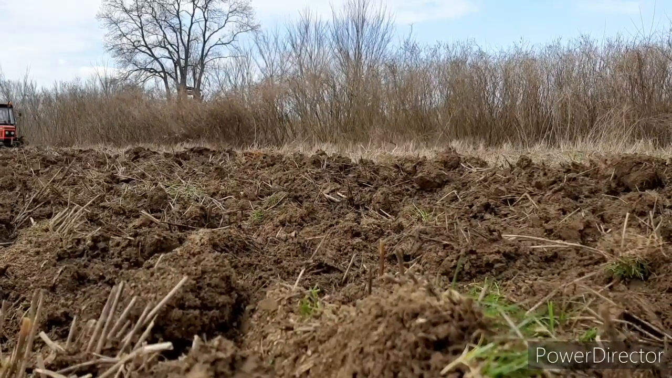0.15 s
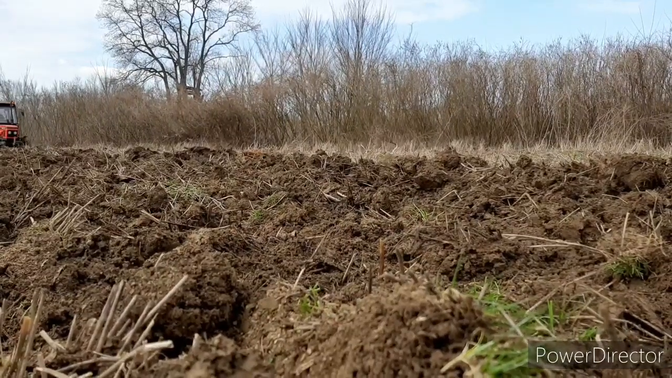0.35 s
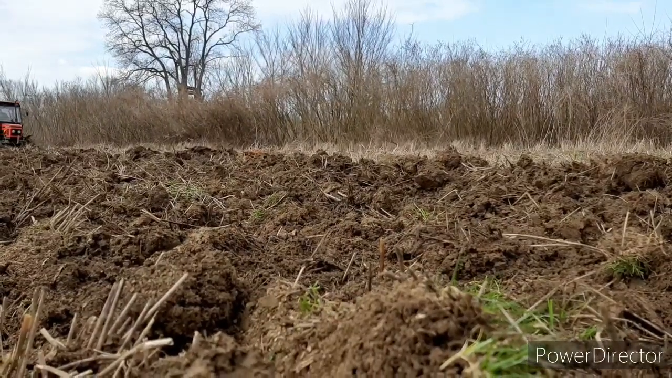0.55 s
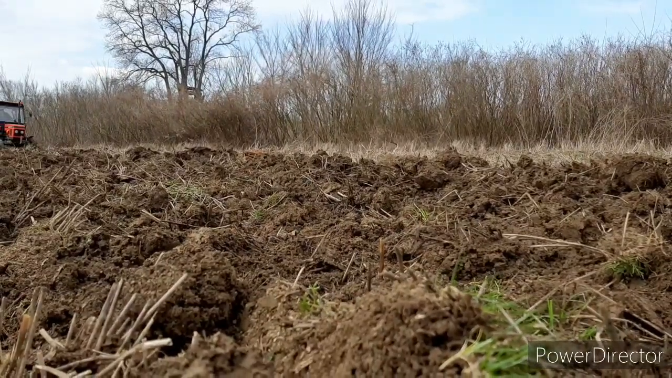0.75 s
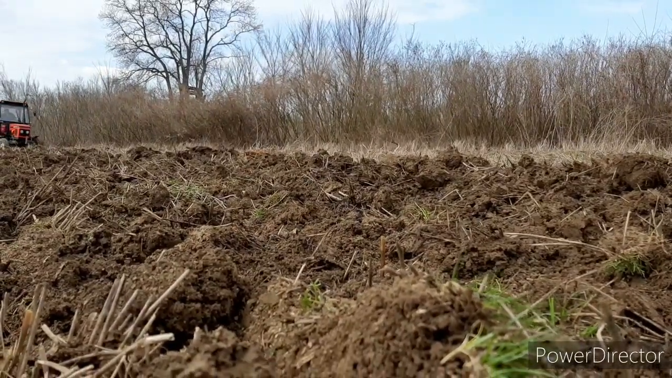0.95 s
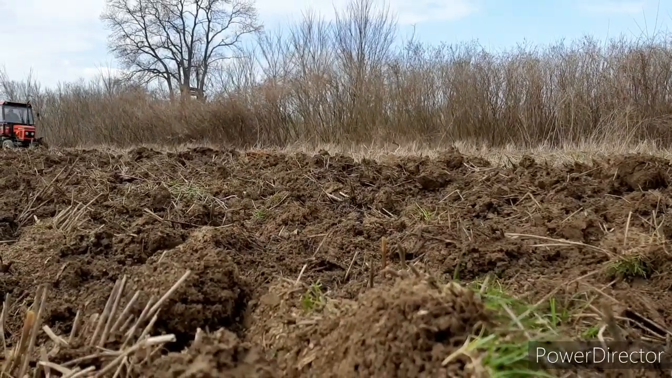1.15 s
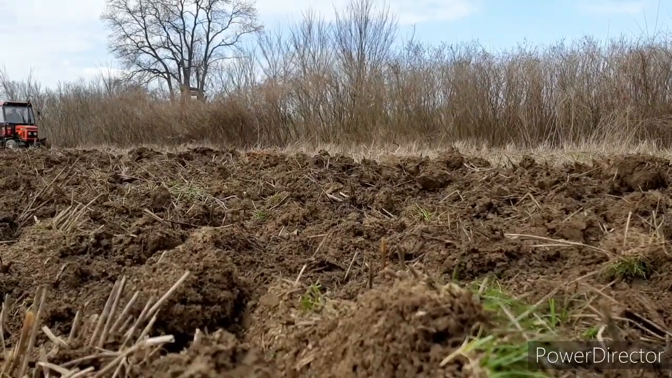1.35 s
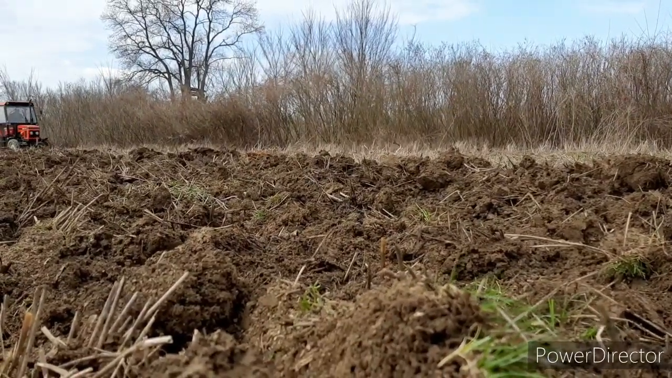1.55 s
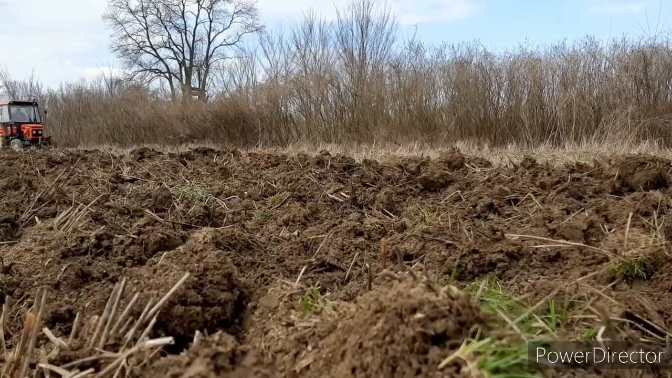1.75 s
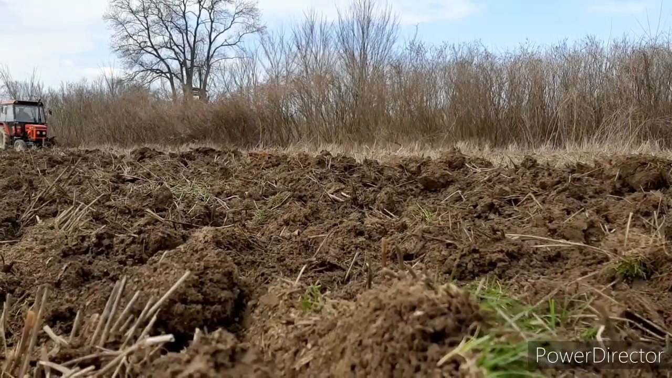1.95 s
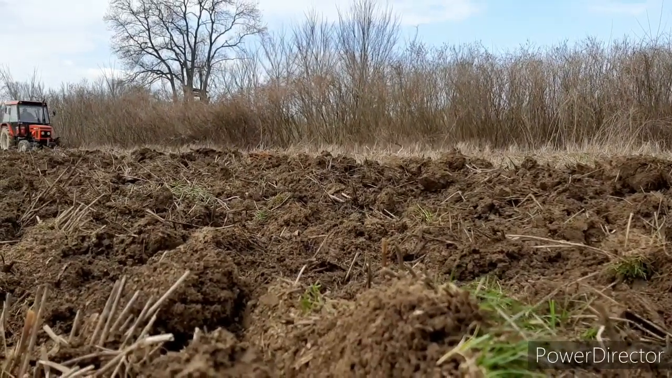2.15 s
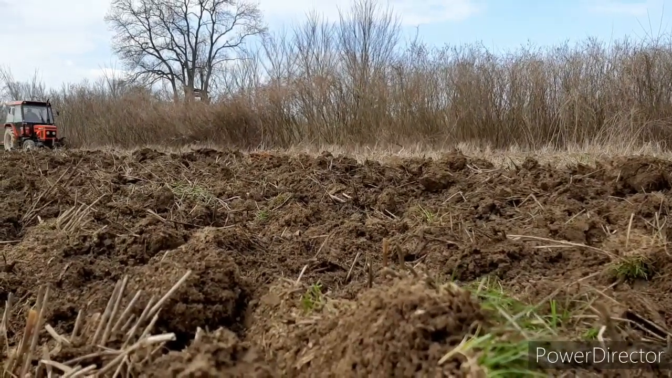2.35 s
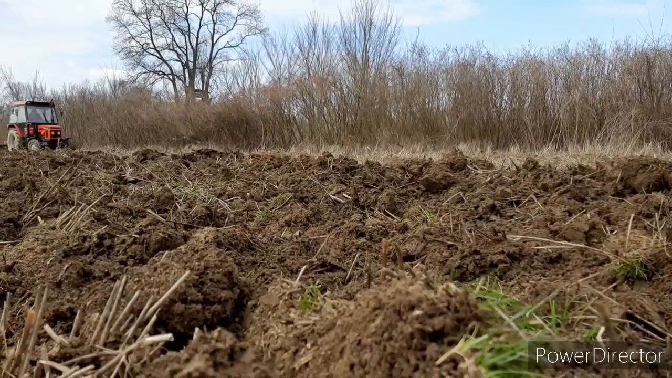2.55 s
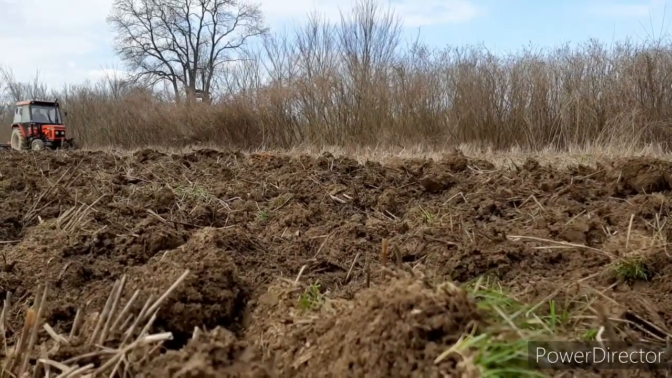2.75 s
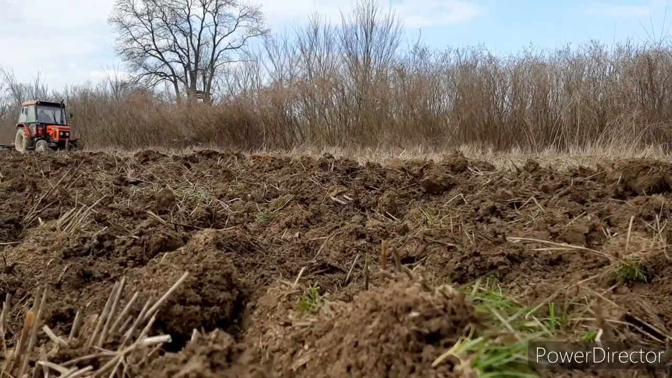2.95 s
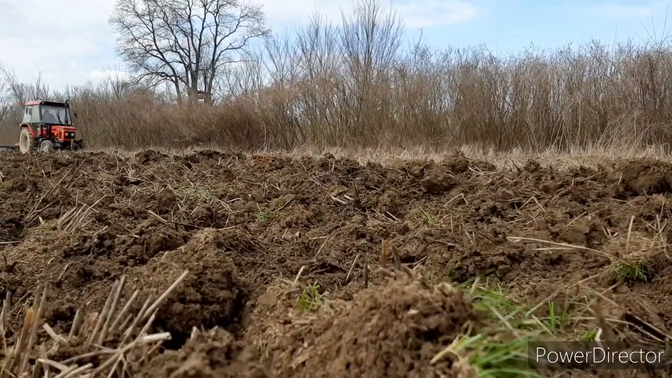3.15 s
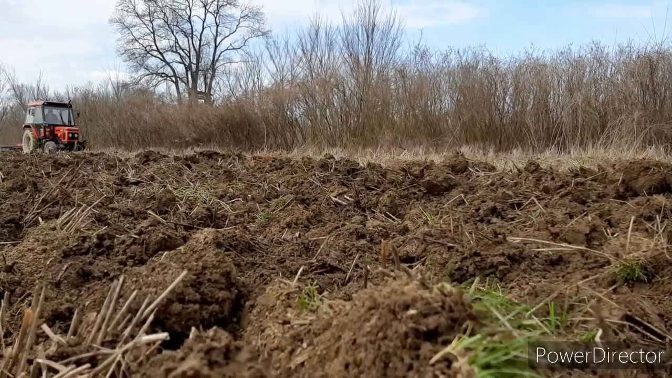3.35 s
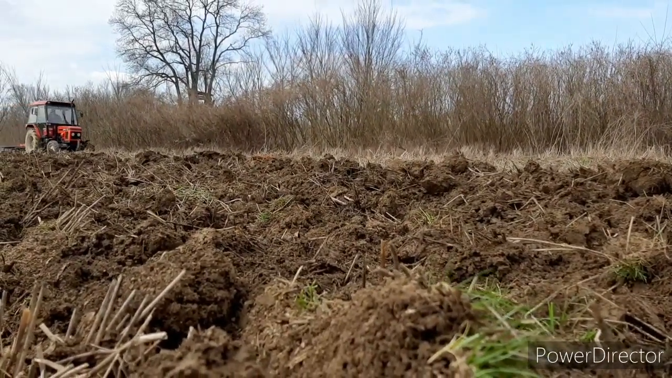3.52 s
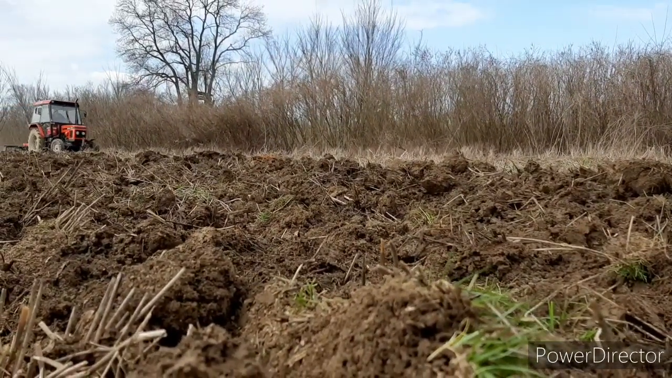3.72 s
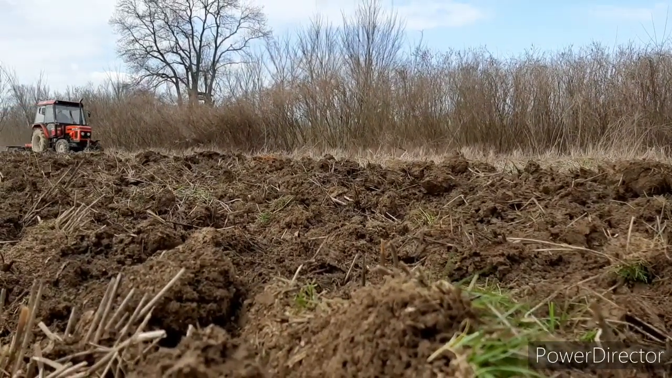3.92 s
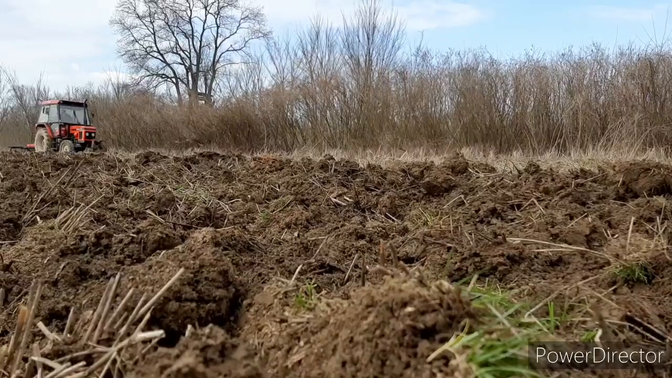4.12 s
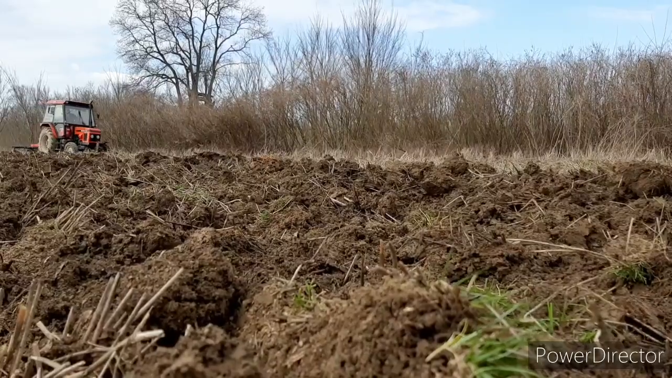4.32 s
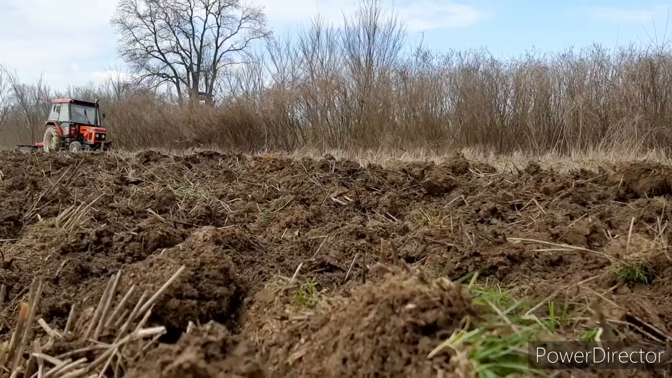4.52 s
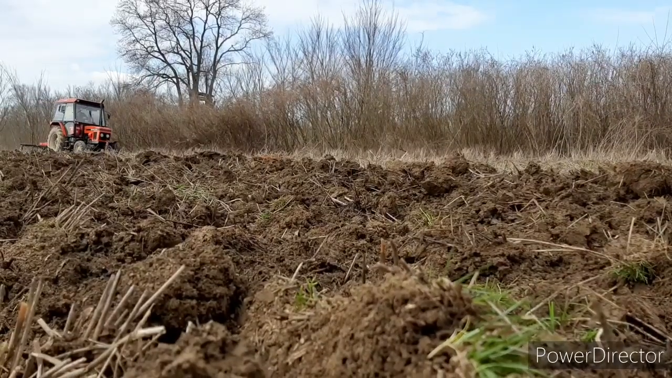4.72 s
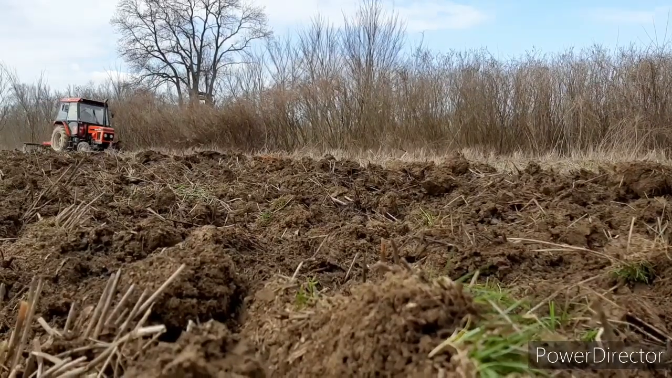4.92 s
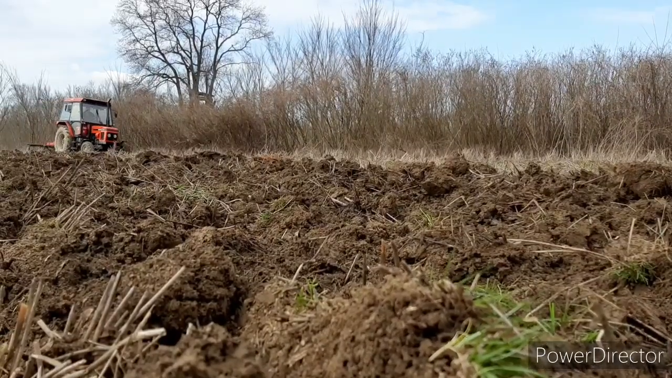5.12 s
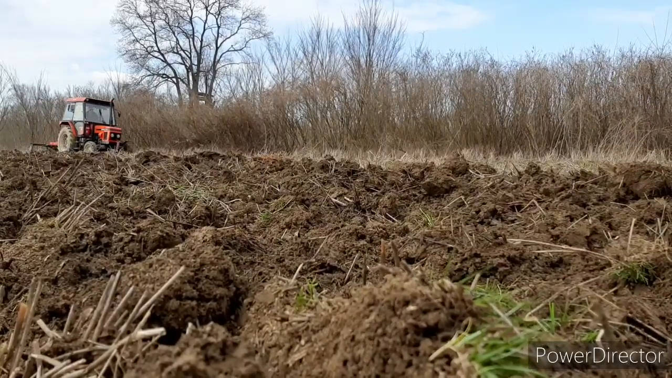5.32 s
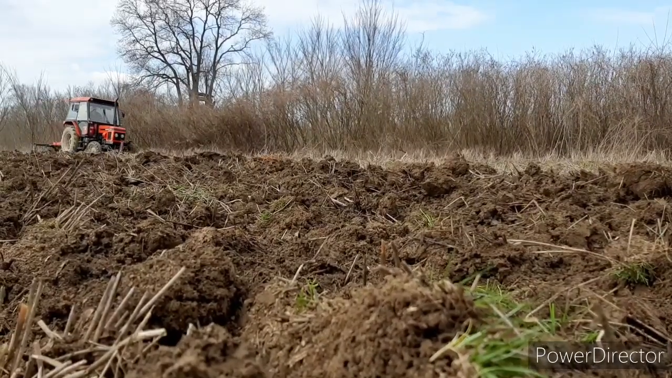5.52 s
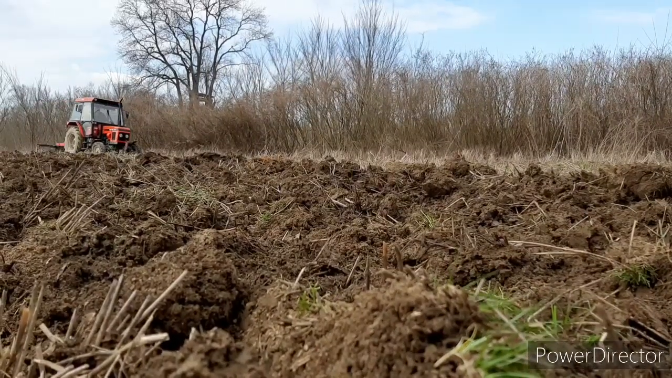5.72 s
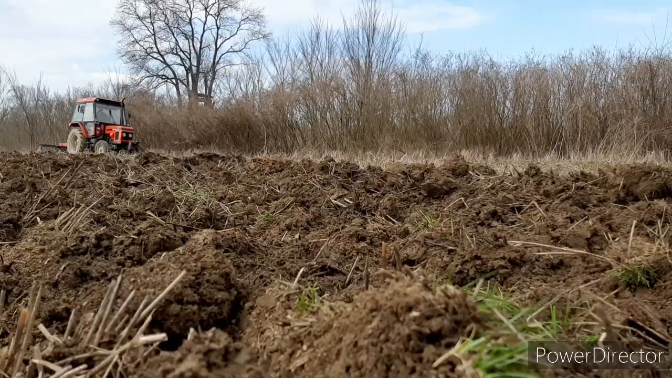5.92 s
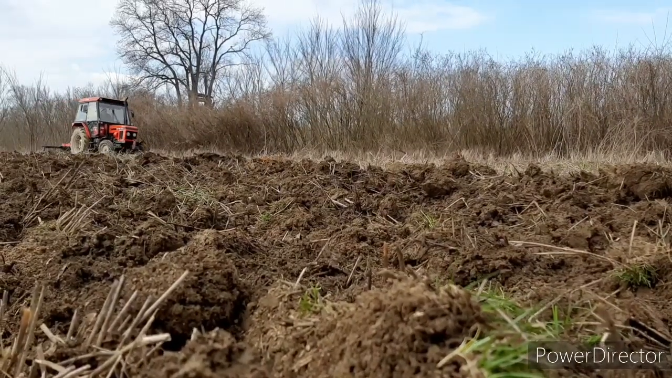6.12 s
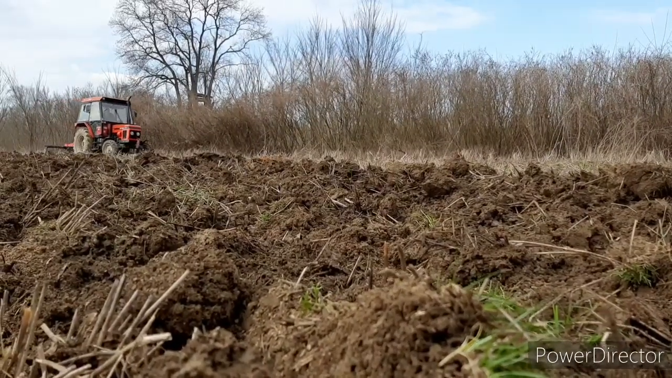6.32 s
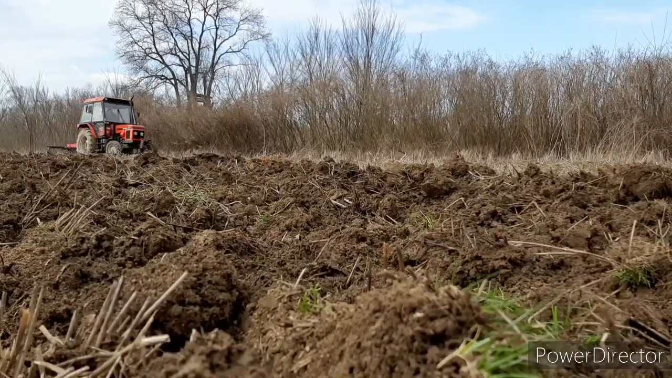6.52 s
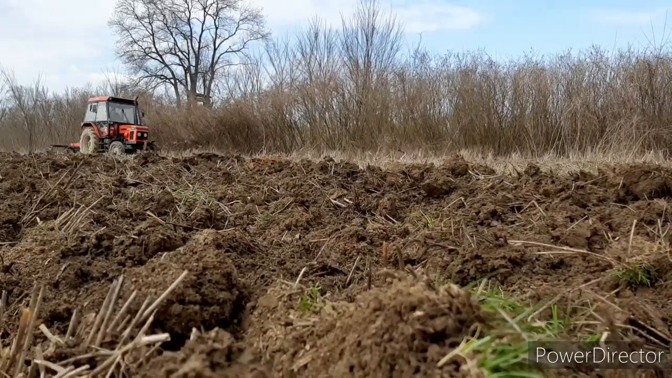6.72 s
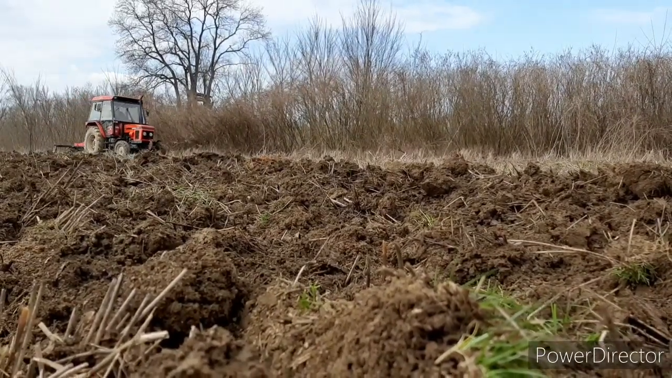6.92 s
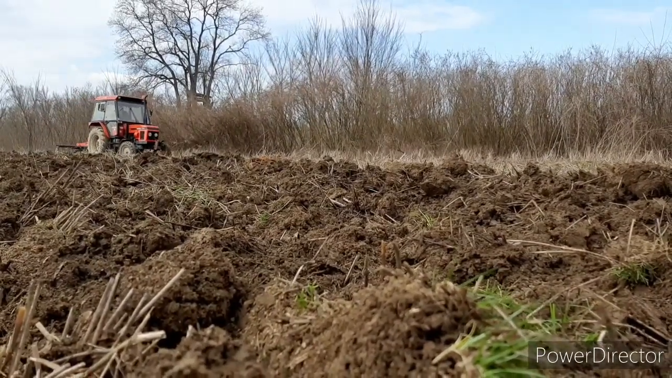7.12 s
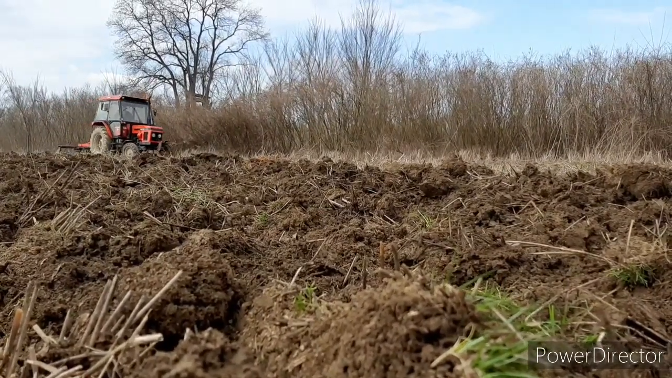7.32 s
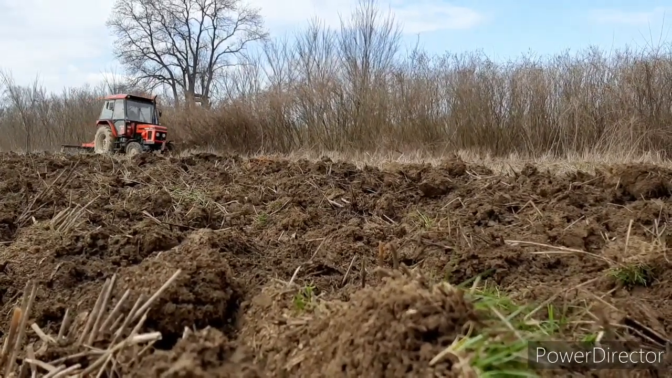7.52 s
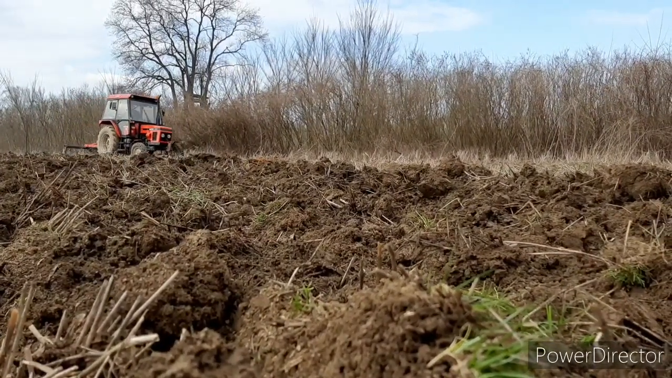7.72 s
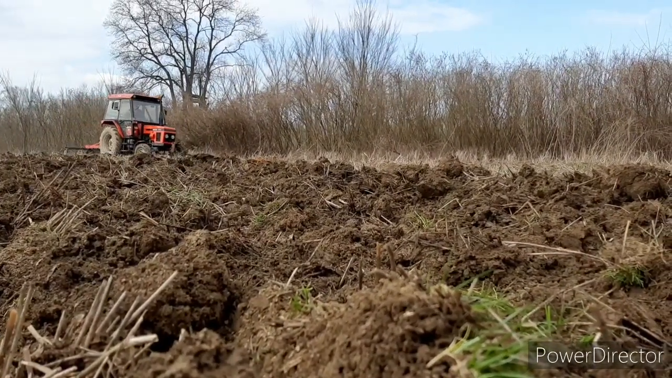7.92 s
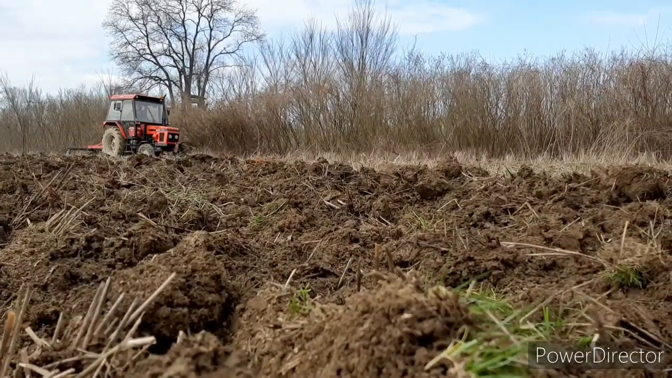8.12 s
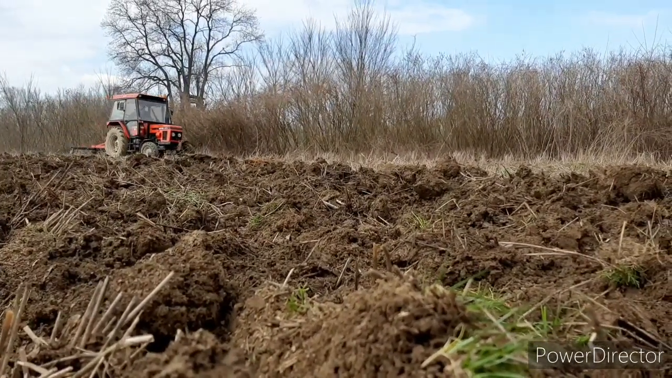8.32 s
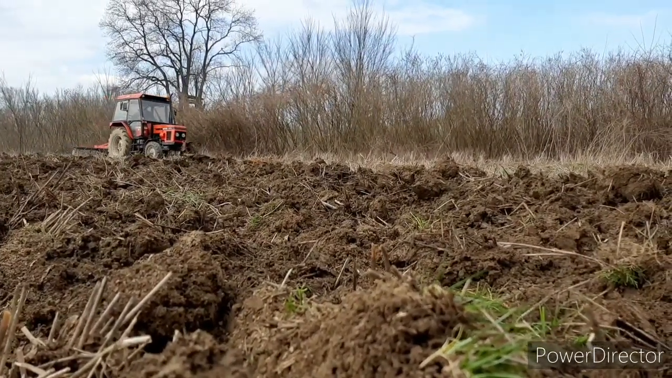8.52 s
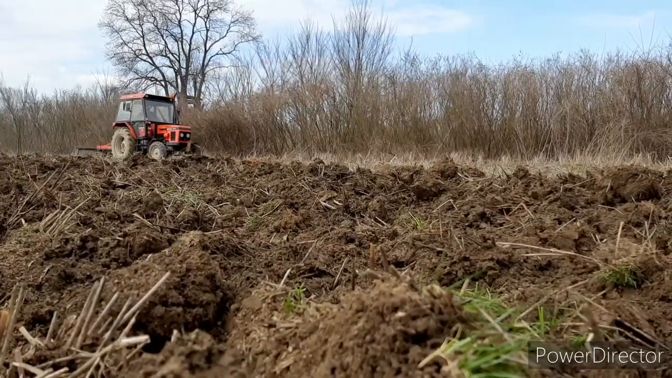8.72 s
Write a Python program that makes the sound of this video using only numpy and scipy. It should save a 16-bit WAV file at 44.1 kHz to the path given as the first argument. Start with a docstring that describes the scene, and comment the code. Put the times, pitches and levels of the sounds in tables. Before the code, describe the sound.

Outdoors on ploughed ground, a tractor's diesel engine drones deeply at a distance and gradually approaches the microphone, its speed wavering slightly under load. The bonnet and panels rattle with the firing, with occasional small clangs. The towed disc harrow adds a gritty hiss of soil, thin ringing and a few brief stone scrapes, while nearby dry straw gives scattered sharp ticks.

```python
"""A four-cylinder diesel tractor slowly draws nearer across a ploughed field, pulling a disc harrow.
Its exhaust booms at the firing rate and an octave above, and every firing makes the sheet metal
and the engine block clatter. Behind it, soil hisses over the harrow's steel discs, which ring and
now and then scrape a stone. Dry stalks tick as they snap close to the listener."""
import sys
import numpy as np
from scipy import signal
from scipy.fft import rfft, irfft, next_fast_len
from scipy.io import wavfile
from scipy.ndimage import map_coordinates

SR = 44100
rng = np.random.default_rng(int(sys.argv[2]) if len(sys.argv) > 2 else 0)


def output_pcm(signal):
    """Save a mono or channel-first signal as 16-bit PCM at the path in sys.argv[1].

    Samples are clipped to [-1, 1] before scaling.
    """
    pcm = np.clip(np.atleast_2d(signal).T, -1, 1) * 32767
    wavfile.write(sys.argv[1], SR, np.round(pcm).astype(np.int16))


N = 386316

START_M, DRIVE_M_PER_S = 43.3, 1.74
SWELL_S = 0.65   # the engine swells in over this time
LEFT_LAG_S = 0.0009644   # many sounds reach the left ear this much later

# The engine speed wavers under the load. Each row: time in seconds, twice the firing rate in Hz.
ENGINE_SPEED = [(0.0, 96.0), (0.63, 95.64), (1.4, 96.28), (2.32, 96.04), (2.44, 97.92), (2.61, 97.86),
                (2.75, 96.49), (3.7, 96.04), (4.64, 95.42), (4.8, 97.71), (4.98, 97.98), (5.1, 96.17),
                (5.51, 96.22), (5.61, 95.7), (6.3, 95.28), (6.98, 94.42), (7.15, 95.99), (8.0, 96.1),
                (8.76, 96.26)]
# The strength of each of the four firings, in dB.
CYLINDERS_DB = [-0.11, -1.7, 1, 1]
# Unequal cylinders add weak tones. Each row: multiple of the engine cycle rate, dB against the octave.
SIDE_TONES = [(5, -29), (7, -26), (9, -30), (11, -36), (12, -39), (17, -34), (18, -44), (24, -33),
              (28, -43)]

# The tone colours of noises. Each row: frequency in Hz, relative level in dB.
RUMBLE_COLOUR = [(45, -13), (75, -2), (105, 3.5), (135, 1.5), (170, -8.5), (215, -10), (250, -11.5),
                 (310, -12.5), (370, -17.5), (440, -27), (490, -34), (900, -41)]   # swirling exhaust gas
FAN_COLOUR = [(480, -33), (640, 3.5), (1100, 4.5), (1900, 5), (2400, 1), (3000, 2), (4000, -4), (6500, -18),
              (8300, -14), (11000, -41), (16000, -41)]   # fan and gears
SOIL_COLOUR = [(1000, 8.5), (4000, -9), (7000, 8), (8500, 0.5), (12000, 3.5), (15500, 0)]   # sliding soil
STONE_COLOUR = [(500, -20), (1300, 3), (2500, -2), (6500, 0), (8500, -12), (15000, -17)]   # a disc on a stone

# Modes are the pitches at which a part rings. Each row: pitch in Hz, width in Hz, left level in dB,
# right level in dB, change from far to near in dB.
SILENCER_MODES = [(583.7, 74.5, -54, -49.5, -13)]
SHIELD_MODES = [(682.6, 162, -55.5, -50.5, 2.4), (813.6, 191, -54.5, -46, 2.4)]   # the heat shield around the silencer
BONNET_MODES = [(941.4, 90, -5.5, 6.84, 0)]
PANEL_MODES = [(1214, 183, -6, -6, 5.2), (1383, 188, -4.5, 0.5, 3.2), (1548, 35, -11, -4, 5.2)]
BLOCK_MODES = [(2017, 109, -2.5, -7.5, -7), (2166, 164, -3.5, -3.5, 1), (1913, 406, -2.5, -5, 2.5)]
INJECTOR_MODES = [(2520, 205, -8.5, -6, 8), (2977, 490, -16, -4, 9), (3355, 134, -13, -15.5, -9),
                  (3712, 370, -9.5, -8, 8), (4250, 240, -11.5, -8, 7.5), (5130, 480, -9, -11.5, -4),
                  (5580, 280, -25, -5, 8.5), (5917, 196, -12.5, -9.5, -8.5), (6185, 195, -28, -9, 14),
                  (6580, 430, -23, -15, -9), (6680, 210, -20, -11, 18), (7530, 850, -17, -12, 2)]
DISC_LOW_MODES = [(4480, 380, -17.5, 6, -5)]
DISC_HIGH_MODES = [(12420, 170, -7, -6, 3)]
GRIT_MODES = [(9800, 1050, -10, -7.5, 7), (12000, 900, -13, -18, 15), (13200, 1900, -9.5, -13, 21)]   # grit on the disc edges
# Sound bouncing off the ground favours other modes as the tractor closes in.
# Each row: time in seconds, nearness on a scale from -0.5 (far) to 0.5 (near).
NEARNESS = [(0, -0.23), (3.5, -0.21), (5.5, 0.039), (7, 0.29), (8.76, 0.4)]

# Each cylinder knocks on a part in its own way. Each row: place in the cycle from 0 to 1, strength in dB.
SILENCER_BLOWS = [(.03, -13), (.30, -8), (.55, 0), (.83, -8)]
SHIELD_BLOWS = [(.02, -3.5), (.33, -3), (.59, 0), (.87, -.5)]
BONNET_BLOWS = [(.12, -3.5), (.32, -3), (.62, -9), (.88, 0)]
PANEL_BLOWS = [(.07, -4), (.37, -5.5), (.57, 2.5), (.82, 2)]
BLOCK_BLOWS = [(.08, -4), (.37, -2), (.58, -1), (.87, 0)]

# Levels that rise and fall. Each row: time in seconds, level in dB.
BONNET_CURVE = [(0.0, -56.5), (0.73, -48.5), (1.4, -49), (1.9, -46.5), (2.7, -49), (3.6, -47.5),
                (5.1, -46.5), (5.65, -44), (6.1, -46.5), (6.83, -45), (7.32, -54), (7.51, -48), (8.76, -51)]
BLOCK_CURVE = [(0.0, -54), (0.3, -53), (0.65, -47.5), (0.9, -48.5), (1.15, -45), (1.7, -43.7), (2.05, -46),
               (2.7, -45.5), (3.25, -43), (3.65, -44.8), (3.85, -46.3), (5.0, -47), (5.68, -45),
               (6.1, -47.8), (6.75, -44.3), (7.3, -46), (8.45, -43), (8.76, -44)]
TREBLE_CURVE = [(0.0, -50.5), (0.36, -49.5), (0.68, -47), (1.46, -44), (1.66, -42), (2.0, -40.5),
                (2.71, -45), (3.15, -42.5), (4.24, -47.5), (5.49, -47), (7.1, -42.5), (8.76, -42)]   # the treble as it carries over the field
BITE_CURVE = [(0.0, -58.5), (0.27, -61.5), (2.07, -53), (2.8, -57.5), (3.17, -52), (3.78, -56.5),
              (5.78, -55), (6.15, -53.5), (6.42, -51.5), (7.1, -48.5), (7.73, -50.5), (8.44, -50.5),
              (8.76, -51.5)]   # the harrow bites the soil unevenly

# Spells of louder ringing. Each row: middle in seconds, length in seconds, boost in dB.
DEEP_CUTS = [(1.7, .8, 3), (2.38, .2, 3.5), (2.445, .05, 4), (4.85, .25, 5.5), (6.5, 1.2, 3.5)]   # the low ring flares where the discs cut deep
DISC_SINGING = [(6.9, .9, 10)]   # the high ring sings out once
# Dry stalks snap. Each row: start in seconds, level in dB, fade time in seconds, low edge in Hz,
# high edge in Hz, left against right in dB.
STALK_SNAPS = [(.0215, -26, .0005, 2200, 8000, -24), (1.9062, -23.5, .0008, 2300, 10000, -24),
               (3.222, -29, .005, 7000, 12000, -1), (4.925, -30, .006, 12000, 15600, -2),
               (5.208, -29, .014, 11000, 15600, -4), (5.872, -33, .01, 9000, 15600, -2),
               (6.3, -32, .008, 8000, 13000, -2), (7.316, -30, .006, 10500, 15600, -2),
               (7.693, -24, .006, 9000, 13500, -4), (8.049, -26, .006, 12000, 15600, -3),
               (8.627, -27, .006, 12000, 15600, 0)]
# Hard knocks on the bonnet. Each row: middle in seconds, length in seconds, dB against its usual clatter.
BONNET_CLANGS = [(.783, .04, 5), (1.835, .04, 4), (1.975, .03, 2), (2.09, .035, 3), (2.655, .035, 4),
                 (3.506, .03, 7), (3.813, .025, 6), (4.488, .03, 4), (4.65, .04, 4), (4.95, .035, 3),
                 (5.147, .03, 5), (5.566, .03, 5), (5.65, .04, 5), (5.813, .03, 2), (6.652, .03, 5)]
# Discs grind over stones. Each row: start in seconds, level in dB, length in seconds.
STONE_SCRAPES = [(2.40, -43, .05), (5.203, -44, .014), (5.98, -44, .02), (6.745, -45, .015),
                 (7.21, -33.5, .04), (7.648, -37, .01), (8.128, -33, .014)]


def from_db(db):
    """Turn decibels into a number to multiply a sound by."""
    return 10 ** (np.asarray(db) / 20)


def rms_one(x):
    """Scale a signal so that its average power is one."""
    return x / np.sqrt(np.mean(x ** 2) + 1e-20)


def curve(rows):
    """Join rows of time and value with straight lines, giving a value for every sample."""
    return np.interp(np.arange(N) / SR, *np.transpose(rows))


def bell(middle_s, length_s):
    """A smooth hump that rises to one and falls away."""
    return np.exp(-np.minimum((2 * (np.arange(N) / SR - middle_s) / length_s) ** 2, 20))


def spells_db(spells):
    """A boost in dB that swells and fades once for each spell."""
    return sum(db * bell(middle_s, length_s) for middle_s, length_s, db in spells)


def swell_db(depth_db):
    """Start this many dB softer and rise to the full level."""
    return -depth_db * np.clip(1 - np.arange(N) / (SWELL_S * SR), 0, 1)


def closing_db():
    """How many dB the tractor gains by driving steadily nearer."""
    return 20 * np.log10(START_M / (START_M - DRIVE_M_PER_S * np.arange(N) / SR))


def pan(left_db):
    """Left and right gains; a negative number moves the sound to the right."""
    return from_db(np.array([[left_db], [-left_db]]) / 2)


def band(x, low_hz, high_hz, order=2):
    """Keep the sound between two frequencies."""
    edges = np.clip([low_hz, high_hz], 10, .48 * SR)
    return signal.sosfilt(signal.butter(order, edges, "band", fs=SR, output="sos"), x)


def coloured(x, colour):
    """Give a noise a tone colour and a power of one."""
    hz, db = np.transpose(colour)
    size = next_fast_len(N)
    log_hz = np.log(np.arange(size // 2 + 1) * SR / size + 1)
    gain = from_db(np.interp(log_hz, np.log(hz), db))
    return rms_one(irfft(rfft(x, size) * gain, size)[..., :N])


def drift(turns_per_s):
    """A random wander whose typical size is one."""
    points = rng.standard_normal(4096)
    return rms_one(map_coordinates(points, [np.arange(N) * turns_per_s / SR], order=1, mode="wrap"))


def two_ears(alike, lag_s=0):
    """Stereo noise, partly shared by both ears; the shared part reaches the left lag_s later."""
    shared = rng.standard_normal(N)
    direct = np.array([np.roll(shared, round(lag_s * SR)), shared])
    return np.sqrt(alike) * direct + np.sqrt(1 - alike) * rng.standard_normal((2, N))


def resonance(drive, hz, width_hz, left_db, right_db, near_db):
    """One mode rings, with its own level in each ear and its own change with distance."""
    ring = rms_one(band(drive + 1e-18, hz - width_hz / 2, hz + width_hz / 2, order=3))
    return ring * from_db([[left_db], [right_db]]) * from_db(near_db * curve(NEARNESS))


def ringing(modes, drive, alike, lag_s=0):
    """Rough shaking rings all the modes of a part; neighbouring modes get different noise."""
    shakes = [drive * two_ears(alike, lag_s) for _ in range(2)]
    return sum(resonance(shakes[k % 2], *mode) for k, mode in enumerate(modes))


def knocks(turns, slop_s):
    """One blow per whole turn, a little early or late, a little stronger or weaker."""
    due = np.flatnonzero(np.diff(np.floor(turns)))
    late, strength = rng.standard_normal((len(due), 2)).T
    landed = np.clip(due + (late * slop_s * SR).astype(int), 0, N - 1)
    blows = np.zeros(N)
    blows[landed] = from_db(1.3 * strength)
    return blows


def knocked(modes, pattern, cycle, beat, rattle_db, alike, slop_s, chatter_s, lag_s=0):
    """Every firing sets a part chattering for a moment, on top of a rattle that never stops."""
    blows = sum(from_db(db) * knocks(cycle - place, slop_s) for place, db in pattern)
    chatter = rms_one(signal.oaconvolve(blows, np.hanning(round(chatter_s * SR)), "same"))
    force = chatter + from_db(rattle_db) * beat
    out = 0
    for hz, width_hz, *levels in modes:
        shake = rms_one(band(two_ears(alike, lag_s), hz - width_hz / 2, hz + width_hz / 2))
        limited = np.tanh(shake)   # the part can only move so far, which keeps the knocks even
        out = out + resonance(force * limited, hz, width_hz, *levels)
    return out


def firing_beat(cycle, steady, length, rise, delay, uneven_db):
    """Four firing shocks a cycle over a steady shaking; times are fractions of one firing."""
    firings = cycle * len(CYLINDERS_DB) - delay
    count, since = np.floor(firings).astype(int), firings % 1
    cylinder = from_db(CYLINDERS_DB)[count % len(CYLINDERS_DB)]
    strength = from_db(uneven_db * rng.standard_normal(1024))[count]
    shock = (1 - np.exp(-since / rise)) * np.exp(-since / length)
    return rms_one(steady + cylinder * strength * shock)


def governor(speed_hz, db_per_hz=0.3, lag_s=0.092):
    """The load in dB: the engine gets more fuel just after it slows, less after it speeds up."""
    s = np.arange(N) / SR
    return db_per_hz * np.interp(s - lag_s, s, speed_hz.mean() - speed_hz)


def exhaust(cycle, beat, load_db):
    """Puffs of gas make a firing tone and its octave, wavering side tones and a rumble."""
    firing_gain = from_db(-32.5 + swell_db(5))
    octave_gain = from_db(-25 + swell_db(4) + closing_db() + load_db)
    angle = 2 * np.pi * cycle
    firing = angle * len(CYLINDERS_DB)
    swing = 0.1 * np.sin(2 * angle)   # the crank speeds up and slows down within each turn
    boom = firing_gain * np.sin(firing) + octave_gain * np.sin(2 * firing + swing)
    side_tones = sum(from_db(db + drift(2.36)) * np.sin(multiple * angle + rng.standard_normal())
                     for multiple, db in SIDE_TONES)
    gas = band(two_ears(alike=0.96) * beat, low_hz=72.4, high_hz=1020)
    rumble = from_db(-17.5) * coloured(gas, RUMBLE_COLOUR)
    return (np.sqrt(2) * boom + octave_gain * (np.sqrt(2) * side_tones + rumble)) * pan(-4.5)


def silencer(cycle, beat, load_db):
    """The hollow silencer and its heat shield ring with each firing, much louder under load."""
    shell = knocked(SILENCER_MODES, SILENCER_BLOWS, cycle, beat,
                    rattle_db=-11, alike=0.93, slop_s=0.0012, chatter_s=0.017)
    shield = knocked(SHIELD_MODES, SHIELD_BLOWS, cycle, beat,
                     rattle_db=-0.5, alike=1.0, slop_s=0.0035, chatter_s=0.015)
    return (shell + shield) * from_db(-1 + swell_db(4.5) + 3.7 * load_db + 0.38 * closing_db())


def bonnet(cycle, beat):
    """The bonnet clatters around one pitch and now and then clangs."""
    clatter = knocked(BONNET_MODES, BONNET_BLOWS, cycle, beat,
                      rattle_db=-7.5, alike=0.98, slop_s=0.0019, chatter_s=0.019)
    return (clatter + bonnet_clangs()) * from_db(curve(BONNET_CURVE) - 1.7)


def panels(cycle, beat):
    """Sheet metal panels rattle with the firings, louder as the tractor nears."""
    clatter = knocked(PANEL_MODES, PANEL_BLOWS, cycle, beat,
                      rattle_db=1.5, alike=0.88, slop_s=0.0013, chatter_s=0.01, lag_s=0.00087)
    return clatter * from_db(-48.5 + swell_db(8) + closing_db())


def engine_block(cycle, beat):
    """Every firing rings the cast iron and steel of the engine."""
    clatter = knocked(BLOCK_MODES, BLOCK_BLOWS, cycle, beat,
                      rattle_db=4.5, alike=0.98, slop_s=0.0013, chatter_s=0.0093, lag_s=LEFT_LAG_S)
    return clatter * from_db(curve(BLOCK_CURVE) - 0.4)


def injectors_and_fan(cycle):
    """The fuel injectors tap brightly over the broad hiss of fan and gears."""
    tapping = firing_beat(cycle, steady=0.36, length=0.32, rise=0.45, delay=0.25, uneven_db=3.5)
    injectors = ringing(INJECTOR_MODES, tapping, alike=0.61, lag_s=LEFT_LAG_S)
    fan = from_db(-4.5) * coloured(two_ears(alike=0.59, lag_s=LEFT_LAG_S), FAN_COLOUR) * pan(-14)
    return (injectors + fan) * from_db(curve(TREBLE_CURVE) - 0.27)


def harrow(beat, crumbs_per_s=600):
    """Soil hisses over the discs, which shake with the engine and ring; crumbs crackle and grit rasps."""
    bite_db = curve(BITE_CURVE)
    sizes = from_db(7.1 * np.minimum(rng.exponential(1, N), 4)) * rng.standard_normal((2, N))
    crumbs = rms_one(sizes * (rng.random(N) < crumbs_per_s / SR))
    flow = (.4 + beat) * from_db(1.1 * drift(25))
    sliding = two_ears(alike=0.37) + from_db(-10) * crumbs
    hiss = from_db(5) * coloured(flow * sliding, SOIL_COLOUR) * pan(-2.7)
    low_db = curve(TREBLE_CURVE) - 7 + spells_db(DEEP_CUTS)
    low_ring = from_db(low_db) * ringing(DISC_LOW_MODES, flow, alike=0.93, lag_s=LEFT_LAG_S)
    high_db = bite_db - 8.5 + spells_db(DISC_SINGING)
    high_ring = from_db(high_db) * ringing(DISC_HIGH_MODES, flow, alike=1.0)
    grit = 0
    for mode in GRIT_MODES:   # each rasp comes and goes on its own
        rasp = flow * two_ears(alike=0.57) * from_db(2.5 * drift(70))
        grit = grit + resonance(rasp, *mode)
    return from_db(bite_db) * (hiss + grit) + low_ring + high_ring


def stalks():
    """Dry straw breaks with a sharp crack, then splinters briefly."""
    out = np.zeros((2, N))
    age = np.arange(SR // 10) / SR
    crack = 1.8 * np.exp(-np.minimum(age / .00012, 20))
    for start_s, db, fade_s, low_hz, high_hz, left_db in STALK_SNAPS:
        splinters = .5 * np.exp(-np.minimum(age / fade_s, 20)) * rng.standard_normal(len(age))
        snap = band(crack + splinters, low_hz, high_hz)
        start = round(start_s * SR)
        out[:, start:start + len(age)] += from_db(db) * pan(left_db) * snap
    return out


def bonnet_clangs():
    """A hard knock keeps the bonnet ringing for a moment on one slightly wavering note."""
    hz, width_hz, left_db, right_db, _ = BONNET_MODES[0]
    loudness = sum(from_db(db) * bell(middle_s, length_s) for middle_s, length_s, db in BONNET_CLANGS)
    pitch_hz = hz + width_hz / 4 * drift(50)
    note = np.sqrt(2) * np.sin(2 * np.pi * np.cumsum(pitch_hz) / SR)
    return loudness * note * from_db([[left_db], [right_db]])


def stones():
    """A disc grinds over a stone with a short swell of rough noise."""
    grind = np.zeros(N)
    for start_s, db, length_s in STONE_SCRAPES:
        age = np.clip((np.arange(N) / SR - start_s) / length_s, 0, 20)
        grind += from_db(db) * 2 * age * np.exp(1 - 2 * age)
    return grind * coloured(two_ears(alike=.6, lag_s=LEFT_LAG_S), STONE_COLOUR) * pan(-6)


def scene():
    """One crankshaft times the exhaust and all the shaking metal; stones and stalks come on top."""
    octave_hz = curve(ENGINE_SPEED)
    cycle = .05 + np.cumsum(octave_hz) / (2 * len(CYLINDERS_DB) * SR)   # counts cycles of four firings
    load_db = governor(octave_hz)
    beat = firing_beat(cycle, steady=0.28, length=0.74, rise=0.17, delay=0.2, uneven_db=1.4)
    tractor = exhaust(cycle, beat, load_db) + silencer(cycle, beat, load_db) + bonnet(cycle, beat)
    tractor += panels(cycle, beat) + engine_block(cycle, beat) + injectors_and_fan(cycle)
    return tractor + harrow(beat) + stones() + stalks()


def record(dry, cutoff_hz=15600):
    """The very top of the treble is cut off steeply."""
    return signal.sosfilt(signal.ellip(12, .1, 80, cutoff_hz, fs=SR, output="sos"), dry)


dry = scene()
out = record(dry)
output_pcm(out)
```